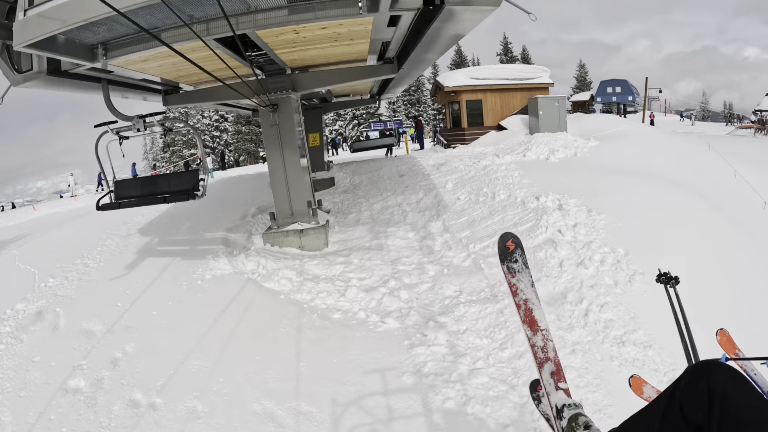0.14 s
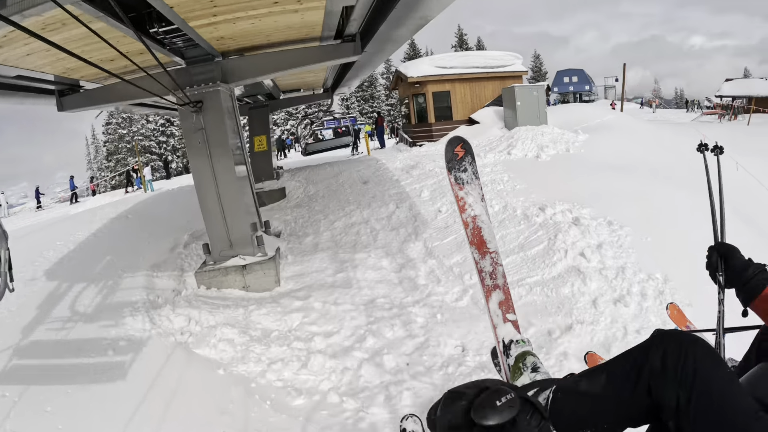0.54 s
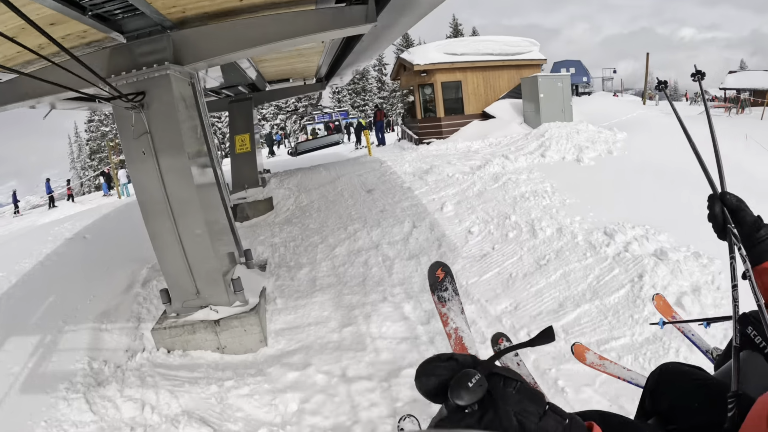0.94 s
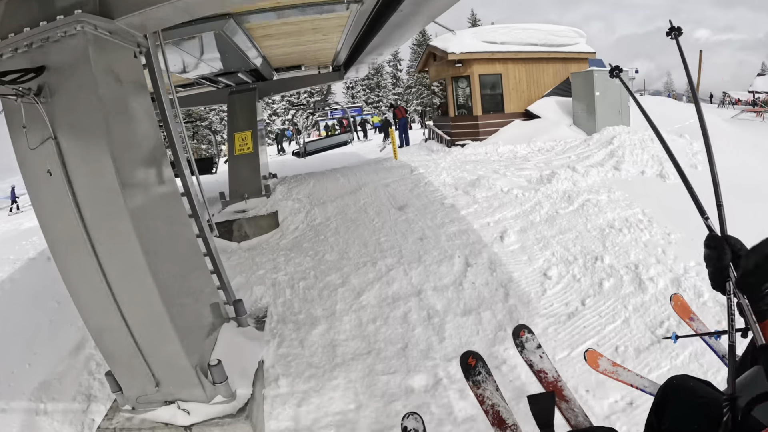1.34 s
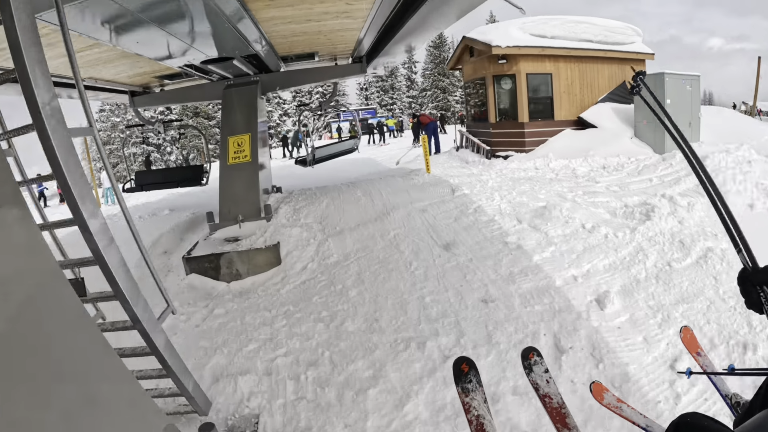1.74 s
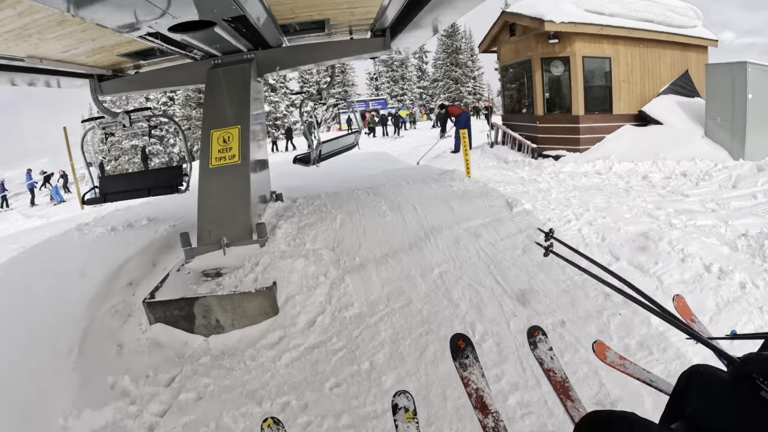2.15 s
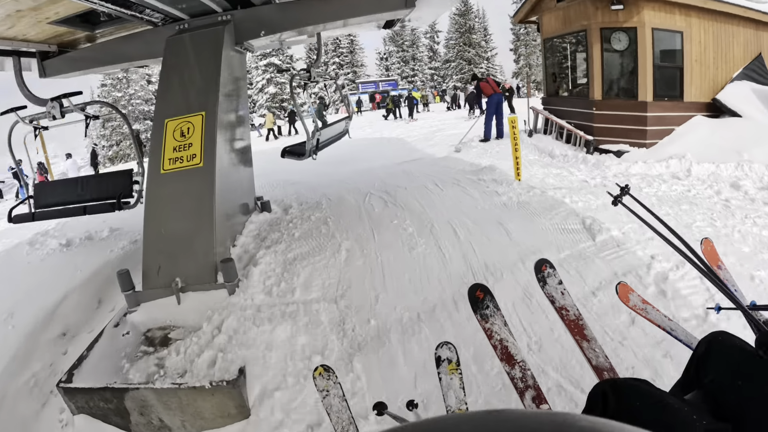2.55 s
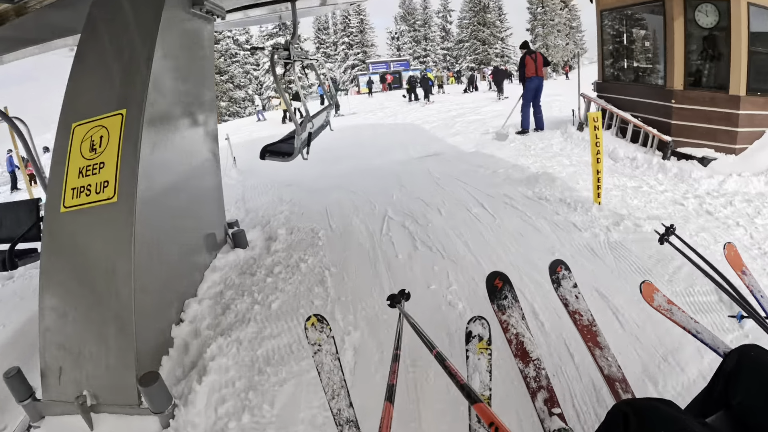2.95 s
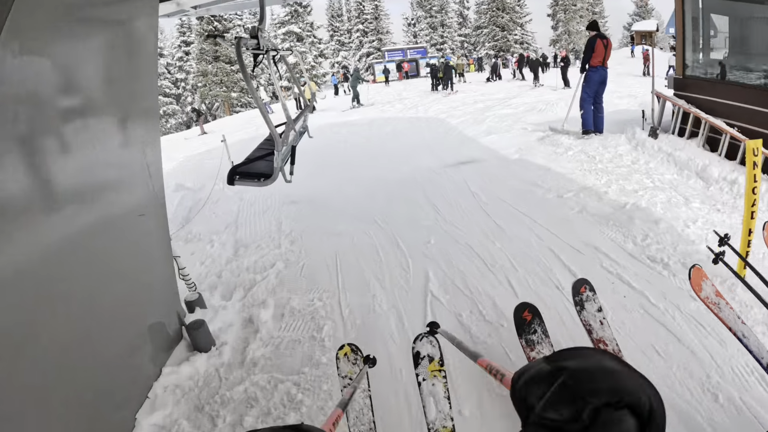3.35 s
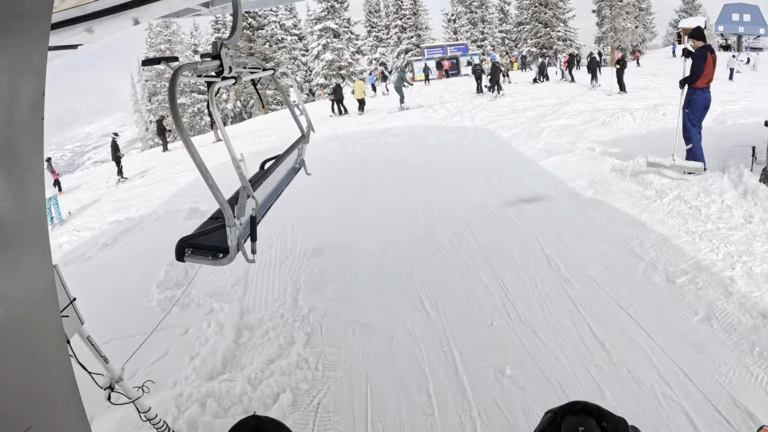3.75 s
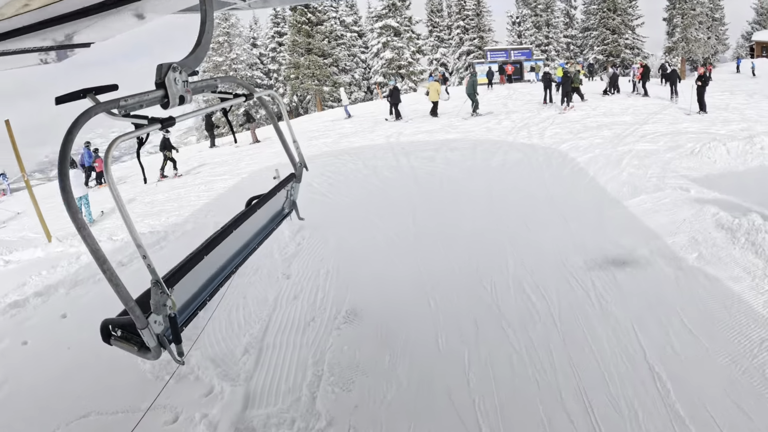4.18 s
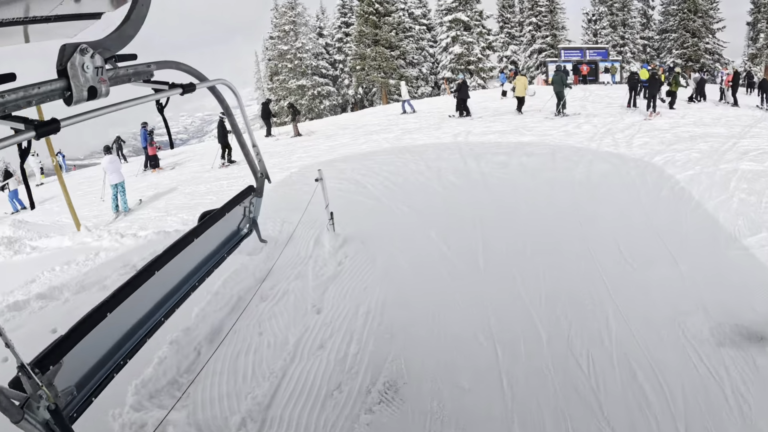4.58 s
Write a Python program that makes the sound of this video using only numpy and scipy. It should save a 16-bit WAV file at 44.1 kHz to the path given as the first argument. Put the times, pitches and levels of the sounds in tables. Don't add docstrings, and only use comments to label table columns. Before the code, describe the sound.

A tenth of a second of open-air noise cuts to silence, then a chairlift ride fades in quickly. Two close low-mid gear tones beat over deep rumble and wind buffets. Soft low thumps and bar rattles come first, then a cluster of hard metallic clacks, later a thin roller whine and one sharp ringing clank. Faint fine snow hiss follows. Outdoor steel terminal, microphone worn by the rider.

```python
import sys
import numpy as np
from scipy import signal
from scipy.io import wavfile
from scipy.ndimage import uniform_filter1d

SR = 44100
rng = np.random.default_rng(int(sys.argv[2]) if len(sys.argv) > 2 else 0)


def unload_audio(sound):
    columns = np.transpose(np.atleast_2d(sound))
    steps = np.round(np.clip(columns, -1, 1) * 32767)
    wavfile.write(sys.argv[1], SR, steps.astype(np.int16))


def volts_from_db(level):
    exponent = np.asarray(level, float) / 20
    return 10 ** exponent


N = 208001

# t/s, lift/dB
MESH_LOW_GRABS = [(.53, 10), (0.759, 12), (1.111, 15.5), (1.25, 6.5), (1.46, 8.5), (1.6, 0), (1.7, 11),
                  (1.861, 12.5), (2.0, 7.5), (2.2, 4), (2.46, 10.5), (2.63, 9), (2.839, 11.5), (3.051, 10),
                  (3.2, 11.5), (3.33, 10), (3.46, 16), (3.62, 5), (3.759, 13.5), (3.931, 15), (4.1, 5.5),
                  (4.25, 14), (4.421, 14.5), (4.57, 13), (4.68, 6.5)]
MESH_HIGH_GRABS = [(.58, 2.8), (0.901, 9.8), (0.998, 10.4), (1.25, 4.8), (1.44, 9), (1.66, 10.4),
                   (1.82, 9.4), (2.06, 12.2), (2.2, 8), (2.35, 8.1), (2.551, 12.3), (2.75, 13.2),
                   (2.9, 10.6), (3.05, 4.8), (3.24, 10), (3.522, 13.6), (3.64, 12.6), (3.8, 2.7),
                   (4.099, 8.8), (4.36, 8.1), (4.571, 12.3), (4.679, 8.1)]
# t/s, f/Hz
MESH_LOW_PITCH = [(.4, 357), (.76, 360), (1.1, 357), (1.25, 363), (1.45, 358), (1.8, 360), (2.1, 354),
                  (2.45, 358), (2.7, 361), (2.9, 357), (3.05, 363), (3.2, 357), (3.55, 357), (3.9, 362),
                  (4.1, 354), (4.3, 355), (4.45, 353), (4.7, 358)]
MESH_HIGH_PITCH = [(.4, 384), (.9, 382), (1.1, 385), (1.3, 380), (1.7, 380), (2.05, 384), (2.2, 381),
                   (2.35, 385), (2.75, 386), (2.95, 381), (3.25, 385), (3.55, 387), (3.8, 383), (4.1, 382),
                   (4.35, 385), (4.55, 381), (4.7, 382)]
# multiple of its pitch, level under the mesh/dB
MESH_OVERTONES = [(2, -18.5)]
# t/s, gain/dB
APPROACH = [
    (.3, 0.5),
    (.65, -3),
    (.8, 1.5),
]
MESH_REST_DB, GRAB_RISE_S, GRAB_FALL_S = -31, 0.086, 0.077
MESH_FLUTTER_DB, MESH_WANDER_HZ = 2.2, 2.4

# t/s, lift/dB
WHINE_SWELLS = [(2.27, -3), (2.36, 17), (2.5, 9), (2.66, 11), (2.73, 5), (2.88, 9), (2.96, 16), (3.02, 11),
                (3.1, 10), (3.2, 14.5), (3.26, 21.5), (3.33, 8), (3.42, 10), (3.58, 9), (3.63, 15.5),
                (3.7, 16), (3.8, 11), (3.88, 5), (4.07, 6.5), (4.33, 10.5)]
# t/s, f/Hz
WHINE_PITCH = [(2.2, 1150), (2.36, 1164), (2.7, 1160), (2.95, 1168), (3.1, 1155), (3.25, 1166),
               (3.42, 1158), (3.7, 1166), (4.3, 1155)]
WHINE_REST_DB, WHINE_RISE_S, WHINE_FALL_S = -50.5, .06, .06

# f/Hz, level/dB per Hz
ROLLING_SPECTRUM = [(18, 2.5), (70, -4), (130, -3.5), (260, -19.5), (430, -10.5), (700, -17.5),
                    (1050, -24.5), (2150, -25), (2700, -38.5), (3700, -41.5), (5200, -50), (7500, -55.5),
                    (11000, -74.5), (13000, -88), (15500, -108)]
# t/s, level/dB
NEARNESS = [(.36, -27.5), (.6, -28), (.95, -32.5), (1.21, -30), (1.27, -22), (1.45, -26.5), (1.7, -26.5),
            (1.95, -26), (2.3, -25), (2.799, -27.5), (3.102, -28), (3.4, -28.5), (3.5, -32), (3.75, -28),
            (4.1, -28.5), (4.7, -29)]
# t/s, lift/dB
JOLTS = [(.33, 7), (.47, 4.5), (.6, 3.5), (.69, 8), (.78, 4.5), (.85, 8), (.95, 7), (1.02, 8.5), (1.1, 7),
         (1.19, 8.5), (1.3, 5), (1.39, 9), (1.5, 5), (1.6, 7.5), (1.66, -4), (1.75, -3), (1.84, 1.5),
         (1.97, 3), (2.05, 1.5), (2.17, 2), (2.28, 3), (2.36, 4.5), (2.51, 2.5), (2.62, 2.5), (2.72, 5),
         (2.84, 0), (2.93, 4.5), (3.03, 8.5), (3.11, 4.5), (3.2, 3.5), (3.3, 5), (3.41, 7.5), (3.55, 5.5),
         (3.63, 6.5), (3.7, 5), (3.8, 5), (3.88, 5.5), (4.03, 4), (4.12, 2.5), (4.2, 4.5), (4.34, 4),
         (4.45, 2.5), (4.52, 1.5), (4.65, 0.5)]
# t/s, level/dB
GUST = [(.27, -14), (.33, -19.5), (.45, -21), (.82, -20), (.92, -31), (1.0, -23.5), (1.2, -22), (1.4, -20),
        (1.7, -26.5), (1.78, -19.5), (1.95, -19), (2.25, -21), (2.45, -23.5), (2.9, -22.5), (3.12, -30),
        (3.4, -28.5), (3.63, -23), (3.85, -30), (4.0, -24), (4.3, -27.5), (4.58, -26), (4.7, -23)]
# t/s, lift/dB
BOOMS = [(.33, 3), (.44, 6), (.99, 9.5), (1.3, 5.5), (1.59, 11), (1.9, 5), (2.05, 11.5), (2.2, 10),
         (2.5, 2.5), (2.98, 4), (3.19, -4), (3.4, -2), (3.87, 4.5), (4.2, 3.5), (4.64, 3)]
BOOM_DB, RAIL_DB, ROAR_DB, SCRAPE_DB = -31, -26.5, -40, -55
BOOM_FOLLOWS, RAIL_FOLLOWS, ROAR_FOLLOWS, SCRAPE_FOLLOWS = 0.59, 1.15, 0.73, 0.18
ROAR_GROWS_DB_PER_S, SCRAPE_SINKS_DB_PER_S = 1, 0.9
JOLT_RISE_S, JOLT_FALL_S, JOLT_ROAR_SHARE, JOLT_RAIL_SHARE = 0.077, 0.051, 0.92, 0.45
BOOM_RISE_S, BOOM_FALL_S = 0.096, 0.055

# f/Hz, width/Hz, relative level/dB
FRAME_MODES = [
    (99.7, 7.9, 5),
    (198.2, 15, -18),
    (311.8, 13, -11.5),
    (4690, 240, -38.5),
]
# t/s, lift/dB
SHAKE = [(.35, 3.5), (.6, 3), (.78, 3), (1.0, 7.5), (1.25, 4), (1.68, 8), (1.95, 6.5), (2.28, 5),
         (2.5, -9.5), (2.75, 11), (2.92, 11), (3.33, 10.5), (3.85, 5.5), (4.2, 4), (4.45, 8.5), (4.65, 5.5)]
SHAKE_REST_DB, SHAKE_RISE_S, SHAKE_FALL_S = -31.5, 0.17, 0.1

# t/s, peak level/dB, lower ring relative level/dB, dry burst level/dB
GRIP = [(1.114, -38, 2.5, -48), (1.173, -36, -15, -33), (1.289, -43, 11, -46), (1.342, -40, 1.5, -30),
        (1.381, -27, -12, -33.5), (1.398, -42, 8, -31.5), (1.421, -34, 1.5, -44), (1.495, -29, -6, -41),
        (1.634, -32.5, 3, -26.5), (1.671, -29.5, -6, -29.5), (1.789, -48, 7, -34.5), (1.844, -35, -12, -35),
        (1.863, -35, -12, -50), (2.179, -43, 8, -33.5), (2.5, -55, 5, -33.5), (2.917, -36, -13, -31),
        (2.962, -30, -8, -37.5), (3.022, -25, 4, -27), (3.1, -35.5, -11, -33), (3.403, -39, 5.5, -32.5),
        (3.631, -48, 8, -37.5)]
GRIP_HZ, GRIP_LOWER_HZ = 5200, 3280
# t/s, peak level/dB, ring f/Hz, dry burst level/dB
RATTLES = [(.453, -35.5, 4150, -37), (0.493, -52, 4200, -30.5), (0.647, -33.5, 3820, -45),
           (0.687, -32, 4860, -31), (.77, -41, 4550, -33.5), (0.825, -27, 4230, -34),
           (0.853, -33, 4320, -33.5), (.928, -35, 4200, -32), (0.946, -51, 3760, -41),
           (3.022, -44, 3520, -35), (3.033, -42, 5400, -44)]
RATTLE_RATIO, RATTLE_UPPER_DB = 1.65, -5.5
# t/s, peak level/dB, dry burst level/dB
HANGER = [
    (1.579, -35.5, -33),
    (1.6, -25, -27),
]
HANGER_HZ, HANGER_LOWER_HZ, HANGER_LOWER_DB = 4700, 2390, 7.5
# f/Hz, level/dB, t60/s
CARRIER_MODES = [(3200, -11, 0.019), (4400, -12.5, 0.043), (5020, -8, 0.025), (6800, -25, 0.025),
                 (8050, -25.5, 0.06), (9600, -29.5, 0.045), (11900, -38, .03)]
RATTLE_TICK_DB, GRIP_TICK_DB, TICK_S, BURST_RISE_S = -11, -40.5, .003, 0.0013

# t/s, peak level/dB, f/Hz, t60/s
PINGS = [(.455, -50, 7150, .02), (.647, -58, 9100, .03), (.647, -54, 5900, .06), (.69, -62, 11500, .04),
         (.69, -60, 12600, .03), (.69, -59, 9800, .03), (.69, -58, 8250, .05), (0.719, -66, 8200, .15),
         (.93, -66, 11300, .05), (1.18, -58, 8150, 0.1), (1.385, -49, 6280, .03), (1.4, -46, 4480, 0.13),
         (1.6, -45, 4600, .1), (3.022, -32, 2860, 0.044), (2.95, -35, 1075, .1), (3.406, -37, 1120, .08),
         (3.405, -40, 1270, .08), (.83, -46, 6760, .04), (1.59, -38, 2460, 0.073), (1.64, -44, 3300, .04),
         (3.025, -46, 7430, .04), (3.024, -49, 8950, .05), (3.006, -52, 8000, .1), (3.032, -48, 8200, .05),
         (3.042, -48, 8100, .05), (3.062, -45, 8030, 0.044), (3.072, -56, 7950, .04),
         (3.09, -57, 8100, .06), (3.108, -57, 8200, .05), (3.03, -43, 4700, .04), (3.035, -40, 3300, 0.046),
         (3.03, -48, 6350, .04), (3.026, -42, 5350, .03), (.84, -46, 4200, .1), (.86, -47, 4900, .06),
         (.945, -47, 4100, .06), (1.5, -51, 4900, 0.11), (3.027, -39, 2530, .05), (3.036, -45, 3480, 0.035),
         (.835, -42, 4900, .04), (.87, -47, 4300, .05), (.96, -49, 3710, .05), (1.4, -52, 8040, .04),
         (1.421, -43, 3300, .05), (1.85, -48, 4800, .04)]
HALL_T60_S, HALL_DB = .3, -9

# t/s, lift/dB
CHAFES = [(.5, 6), (.66, 10), (.7, 0), (.78, -6), (.835, 18), (.86, 15), (.94, 8.5), (1.19, -2), (1.35, 6),
          (1.39, 20), (1.43, 16.5), (1.5, 14), (1.56, 17), (1.6, 20.5), (1.64, 11), (1.68, 14), (1.86, 13),
          (2.19, 6.5), (2.92, 3), (2.97, 11.5), (3.035, 18.5), (3.11, 10), (3.41, 11), (3.64, 16)]
# f/Hz, width/Hz, level/dB
CHAFE_BARS = [(3300, 240, -10), (4570, 300, -6.5), (5270, 300, -7), (6400, 400, -6.5), (7200, 470, -8.5),
              (8200, 350, -3.5), (9100, 590, -11.5), (10000, 600, -16)]
CHAFE_REST_DB, CHAFE_RISE_S, CHAFE_FALL_S = -70, .022, 0.043
CHAFE_GRAIN_DB, CHAFE_BAR_FLICKER_DB = 1.5, 5

# t/s, peak level/dB, f/Hz, t60/s
THUMPS = [(.3, -19, 52, 0.27), (.34, -12, 129, .3), (0.468, -24, 177, 0.17), (0.598, -14, 118, 0.2),
          (0.788, -14, 72, 0.32), (2.049, -25, 204, .2), (2.199, -21, 198, 0.25),
          (2.329, -20.5, 146.5, 0.25), (3.1, -16.5, 55.3, 0.34)]

# t/s, lift/dB
SPRAY = [(3.62, 17), (3.72, 19), (3.82, 22.5), (3.9, 25), (3.98, 24), (4.06, 25.5), (4.14, 26.5),
         (4.21, 24.5), (4.34, 15), (4.51, 15), (4.68, 18)]
SPRAY_REST_DB, SPRAY_RISE_S, SPRAY_FALL_S = -91, .14, .09
SLIDE_START_S, SLIDE_RISE_S, SLIDE_DB = 2.8, .15, -65

# f/Hz, level/dB per Hz
OPEN_AIR_SPECTRUM = [(18, -0.5), (107, 6), (400, -5), (1200, -12), (3000, -24), (6000, -32), (10000, -42),
                     (13500, -46), (16000, -85)]
# t/s, level/dB
OPEN_AIR_LEVEL = [(0, -28), (.03, -27), (.07, -27.5), (.085, -25)]
CUT_S = .088
# t/s, gain/dB
FADE = [
    (.222, -49),
    (.24, -21.5),
    (.26, -10.5),
    (.29, -4),
    (.34, 0),
    (4.7, 1),
    (4.7166, -4.5),
]
CONVERTER_BIAS = .0007


def drive():
    total = 0
    for pitch, grabs in [(MESH_LOW_PITCH, MESH_LOW_GRABS), (MESH_HIGH_PITCH, MESH_HIGH_GRABS)]:
        level_db = MESH_REST_DB + in_time(APPROACH)[0] + swells(grabs, GRAB_RISE_S, GRAB_FALL_S)
        total = total + tone(in_time(pitch)[0], level_db, MESH_OVERTONES, MESH_FLUTTER_DB, MESH_WANDER_HZ)
    return total


def roller_whine():
    level_db = WHINE_REST_DB + swells(WHINE_SWELLS, WHINE_RISE_S, WHINE_FALL_S)
    return tone(in_time(WHINE_PITCH)[0], level_db, [], flutter_db=2.5, wander_hz=3.5)


def tone(hz, level_db, overtones, flutter_db, wander_hz):
    wandering_hz = hz + wander_hz * drift(11.93) + 0.1 * wander_hz * drift(2.87)
    phase = 2 * np.pi * np.cumsum(wandering_hz) / SR
    wave = np.sin(phase)
    for multiple, under_db in overtones:
        wave = wave + volts_from_db(under_db + 0.66 * drift(3.2)) * np.sin(multiple * phase)
    return np.sqrt(2) * volts_from_db(level_db + flutter_db * drift(34)) * wave


def rolling():
    hz, noise = bands(ROLLING_SPECTRUM, patchy_db=.3, shared_db=.5)
    registers_hz = [(0, 165), (165, 330), (330, 1050), (1050, 2600), (2600, 2e4)]
    wind, boom, rail, roar, scrape = [noise[(hz >= low) & (hz < high)].sum(axis=0)
                                      for low, high in registers_hz]
    wind, boom = even(wind, size=6000), even(boom, size=4000)
    roar = lowpass(roar, 4, 2500)
    scrape = lowpass(scrape, 3, 12000)

    near_db = in_time(NEARNESS)[0] - np.mean(np.array(NEARNESS)[:, 1])
    jolt_db = swells(JOLTS, JOLT_RISE_S, JOLT_FALL_S)
    from_middle_s = (np.arange(N) - N / 2) / SR
    wind_db = in_time(GUST)[0]
    boom_db = BOOM_DB + BOOM_FOLLOWS * near_db + swells(BOOMS, BOOM_RISE_S, BOOM_FALL_S)
    rail_db = RAIL_DB + RAIL_FOLLOWS * near_db + JOLT_RAIL_SHARE * jolt_db
    roar_db = ROAR_DB + ROAR_FOLLOWS * near_db + JOLT_ROAR_SHARE * jolt_db
    roar_db = roar_db + ROAR_GROWS_DB_PER_S * from_middle_s
    scrape_db = SCRAPE_DB + SCRAPE_FOLLOWS * near_db + jolt_db - SCRAPE_SINKS_DB_PER_S * from_middle_s
    layers = [(wind_db, wind), (boom_db, boom), (rail_db, rail), (roar_db, roar), (scrape_db, scrape)]
    return sum(volts_from_db(level_db) * rms_one(layer) for level_db, layer in layers)


def frame():
    shaking = rng.standard_normal((len(FRAME_MODES), N))
    rings = []
    for shake, (hz, width, level_db) in zip(shaking, FRAME_MODES):
        rings.append(volts_from_db(level_db) * rms_one(ring(shake, hz, 1.73 / width)))
    main = rms_one(rings[0] / (uniform_filter1d(rings[0] ** 2, size=3000) + .15) ** 0.31)
    main_db = SHAKE_REST_DB + swells(SHAKE, SHAKE_RISE_S, SHAKE_FALL_S)
    return volts_from_db(main_db) * main + volts_from_db(-22.5) * sum(rings[1:])


def blows():
    rattles = [(s, db, hz, RATTLE_RATIO * hz, RATTLE_UPPER_DB, burst_db, RATTLE_TICK_DB)
               for s, db, hz, burst_db in RATTLES]
    grip = [(s, db, GRIP_HZ, GRIP_LOWER_HZ, lower_db, burst_db, GRIP_TICK_DB)
            for s, db, lower_db, burst_db in GRIP]
    hanger = [(s, db, HANGER_HZ, HANGER_LOWER_HZ, HANGER_LOWER_DB, burst_db, GRIP_TICK_DB)
              for s, db, burst_db in HANGER]
    return rattles + grip + hanger


def clacks():
    out, length = np.zeros(N + SR), int(.2 * SR)
    t = np.arange(length) / SR
    burst_filter = np.vstack([signal.butter(1, [1000, 2200], "band", fs=SR, output="sos"),
                              signal.butter(2, 7800, fs=SR, output="sos")])
    pile_up = 1 - np.exp(-t / 0.002)
    burst_shape = (1 - np.exp(-t / BURST_RISE_S)) * np.exp(-t / 0.023)
    for s, peak_db, first_hz, second_hz, second_db, burst_db, tick_db in blows():
        contacts, grit = rng.standard_normal((2, length))
        chatter = signal.lfilter([1], [1, -.45], contacts * np.abs(contacts) ** 0.3)
        chatter = chatter * pile_up * np.exp(-t / 0.0067)
        chatter = 0.58 * chatter / np.sqrt(np.sum(chatter ** 2))
        hit = volts_from_db(3) * (ring(chatter, first_hz, .016) + volts_from_db(second_db) * ring(chatter, second_hz, .016))
        for hz, level_db, t60 in CARRIER_MODES:
            hit += volts_from_db(level_db + rng.normal(0, 2.5)) * ring(chatter, hz, t60)
        burst = signal.sosfilt(burst_filter, 0.67 * grit * np.abs(grit) ** .5 * burst_shape)
        tick = volts_from_db(tick_db) * np.diff(grit, prepend=0) * pile_up * np.exp(-t / TICK_S)
        at = round((s - .002) * SR)
        out[at:at + length] += volts_from_db(peak_db) * (hit + tick) + volts_from_db(burst_db + 8.5) * burst
    return out[:N]


def pings():
    out, t = np.zeros(N), np.arange(250) / SR
    for s, peak_db, hz, t60 in PINGS:
        scuff = rng.standard_normal(len(t)) * .5 + np.sin(2 * np.pi * hz * t) * .3
        push_at_pitch = np.abs(np.sum(scuff * np.exp(2j * np.pi * hz * t)))
        blow, at = np.zeros(N), round(s * SR)
        blow[at:at + len(t)] = volts_from_db(peak_db) * 2 * scuff / push_at_pitch
        out += ring(blow, hz, t60)
    return out


def hall(x):
    t = np.arange(SR // 2) / SR
    tail = rng.standard_normal(len(t)) * volts_from_db(-60 * t / HALL_T60_S) * (1 - np.exp(-t / .004))
    return x + volts_from_db(HALL_DB) * signal.fftconvolve(x, tail / np.sqrt(np.sum(tail ** 2)))[:N]


def dull_top(x):
    return lowpass(x, 3, 11000)


def chafes():
    grit = rng.standard_normal(N) * volts_from_db(CHAFE_GRAIN_DB * drift(150))
    bars = 0
    for hz, width, db in CHAFE_BARS:
        bars = bars + volts_from_db(db + CHAFE_BAR_FLICKER_DB * drift(22)) * rms_one(ring(grit, hz, 2.8 / width))
    rub = lowpass(rms_one(bandpass(grit, 4200, 9800)) + bars, 4, 10800)
    return volts_from_db(CHAFE_REST_DB + swells(CHAFES, CHAFE_RISE_S, CHAFE_FALL_S)) * rms_one(rub)


def thumps():
    out, push = np.zeros(N), np.hanning(1500)
    for s, peak_db, hz, t60 in THUMPS:
        blow, at = np.zeros(N), round(s * SR)
        blow[at - 750:at + 750] = push * np.sin(2 * np.pi * hz * np.arange(1500) / SR) / 375
        out += volts_from_db(peak_db) * ring(blow, hz, t60)
    return out


def spray():
    fine, coarse = rng.standard_normal((2, N))
    fine = rms_one(bandpass(fine, 11600, 14300))
    coarse = rms_one(bandpass(coarse, 6500, 10500))
    sliding = .5 + .5 * np.tanh((np.arange(N) / SR - SLIDE_START_S) / SLIDE_RISE_S)
    fine_db = SPRAY_REST_DB + swells(SPRAY, SPRAY_RISE_S, SPRAY_FALL_S)
    return sliding * (volts_from_db(fine_db) * fine + volts_from_db(SLIDE_DB + 1.5 * drift(4)) * coarse)


def open_air():
    t = np.arange(N) / SR
    noise = bands(OPEN_AIR_SPECTRUM, patchy_db=-4.0, shared_db=-0.5)[1].sum(axis=0)
    air = volts_from_db(in_time(OPEN_AIR_LEVEL)[0]) * rms_one(noise)
    return air * np.where(t < CUT_S, 1, volts_from_db(-40.0) * np.exp(-(t - CUT_S) / 0.013))


def bands(spectrum, patchy_db, shared_db):
    edges, together = 18 * 2 ** np.arange(0, 9.9, 1 / 3), drift(7)
    white = rng.standard_normal((2, N + 8000))
    hz = np.sqrt(edges[1:] * edges[:-1])
    spectrum_hz, spectrum_db = np.transpose(spectrum)
    level_db = np.interp(np.log(hz), np.log(spectrum_hz), spectrum_db)
    out = np.zeros((len(hz), N))
    for k in range(len(hz)):
        noise = bandpass(white[k % 2], edges[k], edges[k + 1])[8000:]
        out[k] = noise * volts_from_db(level_db[k] + patchy_db * drift(6.8) + shared_db * together)
    return hz, out


def ring(clicks, hz, t60):
    r, w = volts_from_db(-60 / (t60 * SR)), 2 * np.pi * hz / SR
    return signal.lfilter([0, np.sin(w)], [1, -2 * r * np.cos(w), r * r], clicks + 1e-18)


def swells(rows, rise_s, fall_s):
    t, out = np.arange(0, N + 64, 64) / SR, 0
    for s, lift_db in rows:
        out = np.maximum(out, lift_db * np.exp(-((t - s) / np.where(t < s, rise_s, fall_s)) ** 2))
    return np.interp(np.arange(N) / SR, t, out)


def in_time(rows):
    s, *columns = np.transpose(rows)
    return [np.interp(np.arange(N) / SR, s, c) for c in columns]


def drift(rate):
    r = np.exp(-80 * np.pi * rate / SR)
    slow = signal.lfilter([1], [1, -2 * r, r * r], rng.standard_normal(N // 40 + 2002))[2000:]
    return np.interp(np.arange(N) / 40, np.arange(len(slow)), rms_one(slow))


def even(x, size):
    return rms_one(x / (uniform_filter1d(rms_one(x) ** 2, size=size) + .1) ** .4)


def rms_one(x):
    return x / np.sqrt(np.mean(x ** 2) + 1e-20)


def lowpass(x, order, hz):
    return signal.sosfilt(signal.butter(order, hz, fs=SR, output="sos"), x)


def bandpass(x, low_hz, high_hz):
    return signal.sosfilt(signal.butter(2, [low_hz, high_hz], "band", fs=SR, output="sos"), x)


def scene():
    machinery = drive() + roller_whine() + rolling() + frame()
    steel_blows = dull_top(hall(clacks()) + pings())
    terminal = machinery + steel_blows + chafes() + thumps() + spray() + CONVERTER_BIAS
    t = np.arange(N) / SR
    fade_in = volts_from_db(in_time(FADE)[0]) * (t > FADE[0][0])
    return (open_air() + terminal * fade_in)[None]


def top_cut(x):
    return signal.sosfilt(signal.butter(12, 15600, fs=SR, output="sos"), x)


def record(dry):
    mix = .7 * np.tanh(lowpass(dry, 3, 14000) / .7)
    return top_cut(mix)


dry = scene()
out = record(dry)
unload_audio(out)
```